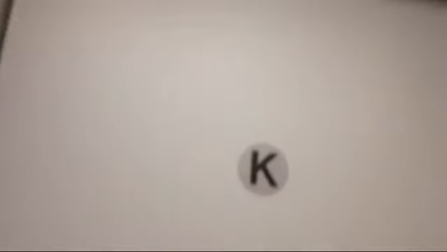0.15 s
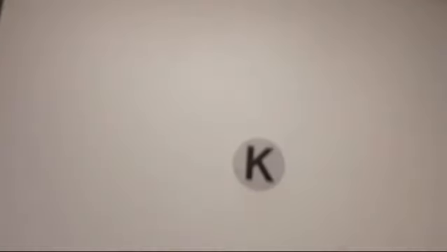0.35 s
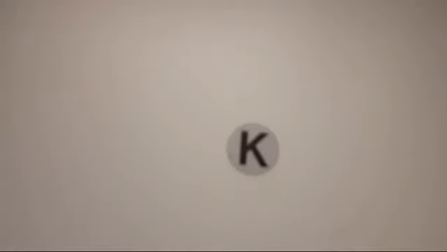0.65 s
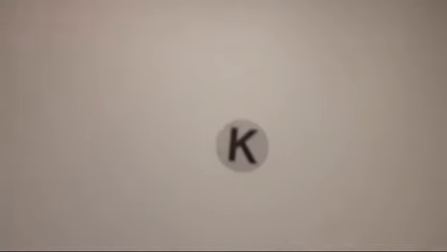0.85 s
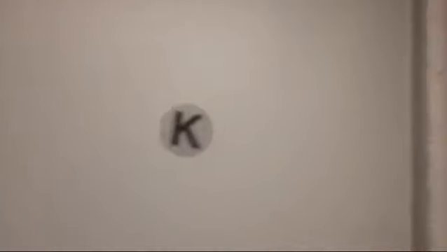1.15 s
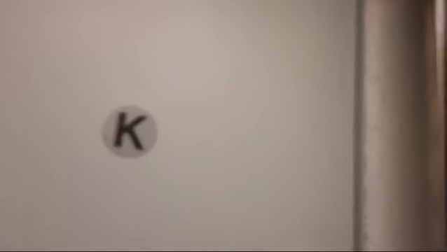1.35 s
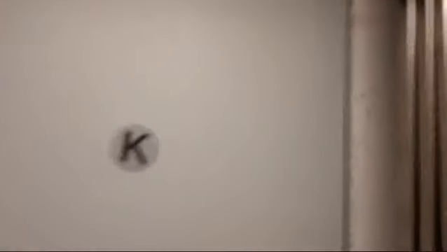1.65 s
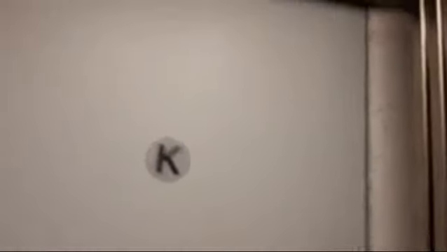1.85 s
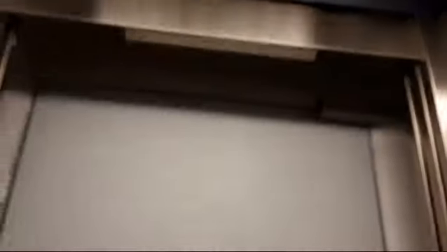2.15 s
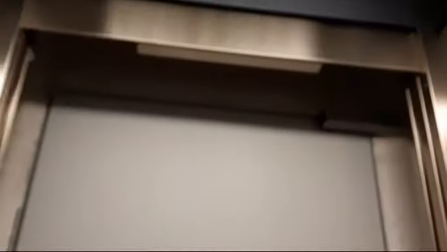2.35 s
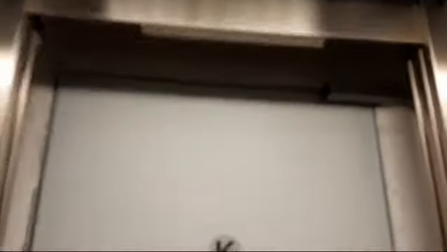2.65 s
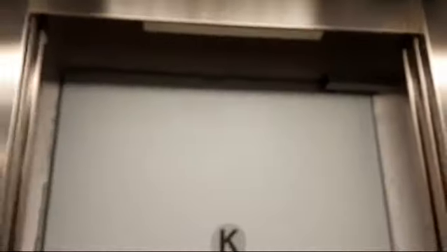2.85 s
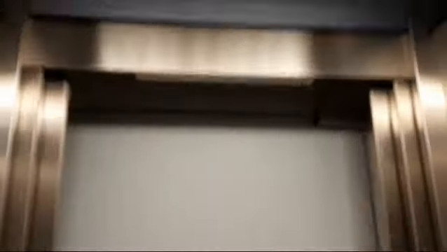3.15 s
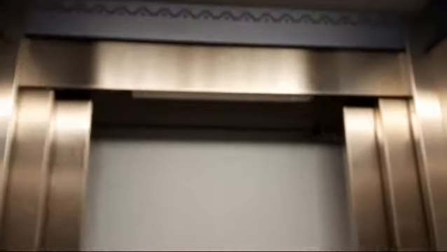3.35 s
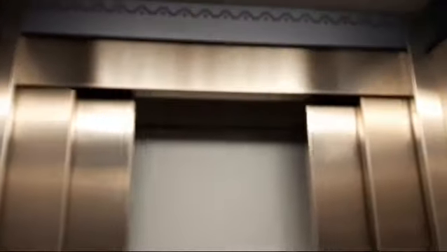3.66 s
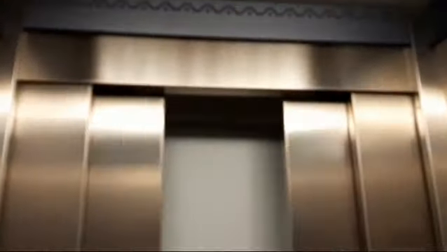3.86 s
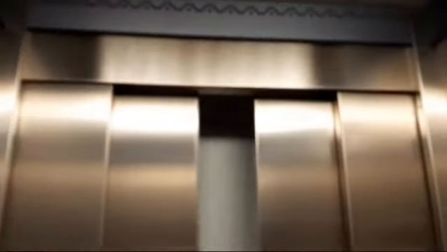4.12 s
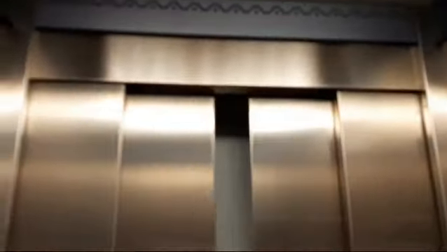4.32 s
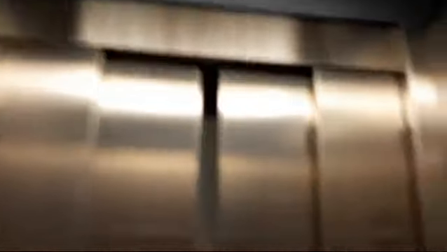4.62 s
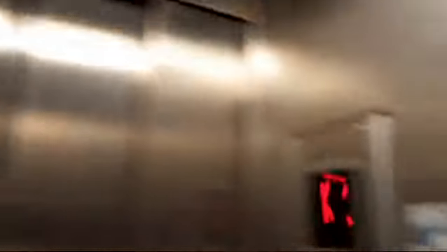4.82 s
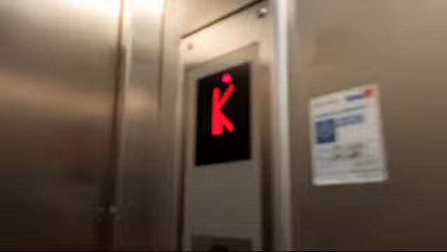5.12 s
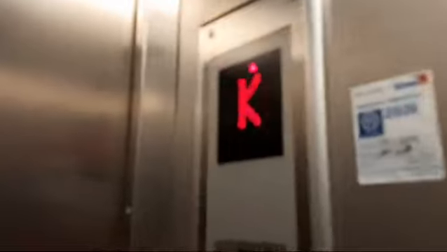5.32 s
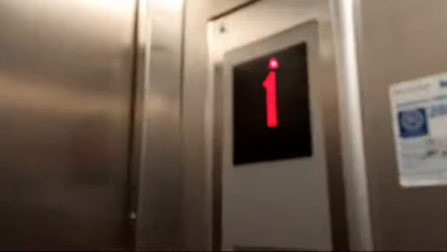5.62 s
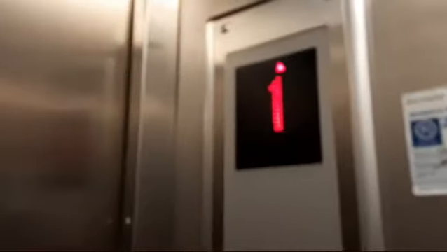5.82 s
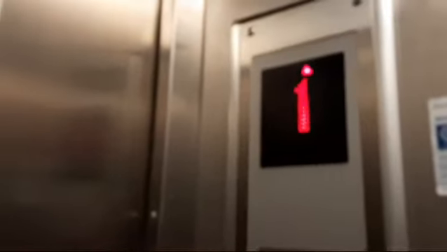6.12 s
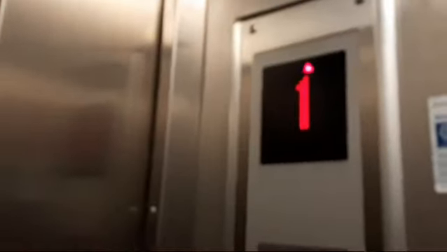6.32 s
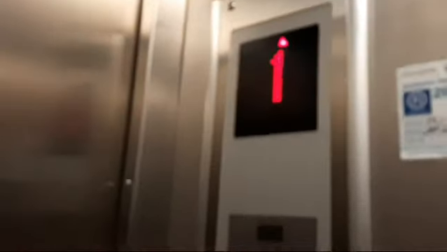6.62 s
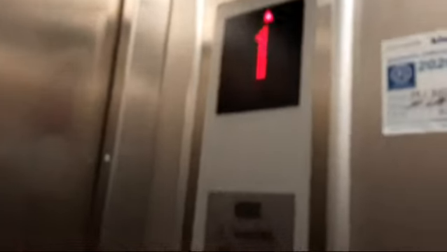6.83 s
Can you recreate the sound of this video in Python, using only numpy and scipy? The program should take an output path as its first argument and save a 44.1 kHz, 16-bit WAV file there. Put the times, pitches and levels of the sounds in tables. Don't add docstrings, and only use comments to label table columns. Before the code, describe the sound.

Close inside a small steel lift car, a faint fan hums while cloth rubs and trim ticks and pops. A sole scuffs and squeaks, feet thud on the hollow floor, then the door gear clanks hard and its rollers grind along. Knocks and soft thuds follow, the latch strikes sharply, and a low drone rises.

```python
import sys
import numpy as np
from scipy import signal
from scipy.fft import rfft, irfft, next_fast_len
from scipy.io import wavfile

SR = 44100
rng = np.random.default_rng(int(sys.argv[2]) if len(sys.argv) > 2 else 0)


def volts_from_db(level):
    exponent = np.asarray(level, float) / 20
    return 10 ** exponent


def pcm_store(signal):
    levels = np.round(np.clip(np.atleast_2d(signal), -1, 1) * 32767)
    wavfile.write(sys.argv[1], SR, levels.astype(np.int16).T)


N = 307818


def in_time(table):
    s, *columns = np.transpose(table)
    return [np.interp(np.arange(N) / SR, s, column) for column in columns]


def at_hz(points, hz):
    point_hz, value = np.transpose(points)
    return np.interp(np.log(hz + 1), np.log(point_hz), value)


def rms_one(x):
    return x / np.sqrt(np.mean(x ** 2) + 1e-20)


def drift(rate):
    steps = rng.standard_normal(int(N / SR * max(rate, 200)) + 2)
    return np.interp(np.arange(N) / SR * rate, np.arange(len(steps)), steps)


# (frequency [Hz], likeness [0-1])
PORT_LIKENESS = [(60, 0.99), (110, 1), (160, 0.66), (290, 0.77), (640, 0.59), (1400, 0.24), (2500, 0.051),
                 (15000, 0.096)]
# (frequency [Hz], left over right [dB])
PORT_BALANCE = [(60, -2.5), (180, -1.5), (550, -1.5), (1650, -3), (4970, -1.5), (15000, -7)]
PORT_LAG_S = 0.00042


def port_noise(spectrum=((10, 0), (20000, 0))):
    size = next_fast_len(N)
    hz = np.arange(size // 2 + 1) * SR / size
    left, other = rfft(rng.standard_normal((2, size))) * volts_from_db(at_hz(spectrum, hz))
    alike = np.clip(at_hz(PORT_LIKENESS, hz), 0, 1)
    lag_s = PORT_LAG_S * hz ** 2 / (hz ** 2 + 1130.0 ** 2)
    right = alike * np.exp(2j * np.pi * hz * lag_s) * left + np.sqrt(1 - alike ** 2) * other
    balance = volts_from_db(np.outer([.5, -.5], at_hz(PORT_BALANCE, hz)))
    return rms_one(irfft([left, right] * balance, size)[:, :N])


def peaks(x, modes):
    out = 0
    for k, (hz, width_hz, db) in enumerate(modes):
        r = np.exp(-np.pi * width_hz / SR)
        feed = [(1 - r * r) / 2, 0, (r * r - 1) / 2]
        back = [1, -2 * r * np.cos(2 * np.pi * hz / SR), r * r]
        out = out + (-1) ** k * volts_from_db(db) * signal.lfilter(feed, back, x)
    return out


def steady_tones(white, tones):
    out = 0
    for hz, width_hz, db in tones:
        narrow = peaks(white, [(hz, width_hz, 0)])
        out = out + volts_from_db(db) * rms_one(peaks(narrow, [(hz, 2 * width_hz, 0)]))
    return out


def ring(x, hz, t60):
    r, w = volts_from_db(-60 / (t60 * SR)), 2 * np.pi * hz / SR
    return signal.lfilter([0, np.sin(w)], [1, -2 * r * np.cos(w), r * r], x + 1e-18)


def band(x, hz, octaves):
    edges = hz * 2.0 ** (max(octaves, .05) * np.array([-1, 1]))
    return signal.sosfilt(signal.butter(2, np.minimum(edges, 19000), "band", fs=SR, output="sos"), x)


def bumps(per_s, size, fade_s):
    jolts = (rng.random(N) < per_s / SR) * np.minimum(rng.exponential(size, N), 2 * size)
    return rms_one(1 + signal.lfilter([1], [1, -np.exp(-1 / (fade_s * SR))], jolts))


def add(out, s, piece, db):
    i = round(s * SR)
    piece = piece[..., :N - i]
    out[:, i:i + piece.shape[-1]] += volts_from_db(db) * piece / np.max(np.abs(piece))


# (time [s], strength [dB], hardness [dB])
SHAKE = [(0, -54, 1.5), (.25, -60.5, 3.5), (.4, -63, -0.5), (.82, -65, -13), (1.2, -60, -15),
         (1.5, -61, -8), (1.7, -46.5, -15.5), (1.86, -60, 8.5), (2.42, -47, -6.5), (2.62, -50, 2),
         (3.04, -41, 3), (3.3, -32.5, -11.5), (4.2, -35, -10), (4.46, -48.5, -7), (5.12, -45, -4),
         (5.45, -51.5, -8), (6.33, -51.5, -14.5), (6.98, -50, -57)]
# (time [s], strength [dB], dying time [s], hardness [dB])
LURCHES = [(.29, -49, 0.012, -0.5), (0.599, -55.5, 0.14, -5.5), (1.07, -49.5, 0.023, -7.5),
           (1.69, -49, 0.024, 2.5), (1.9, -33, 0.12, -8), (2.1, -27, 0.11, -14.5), (2.79, -69, 0.044, -42),
           (3.36, -33, 0.018, -17), (3.45, -28.5, 0.13, -12.5), (3.82, -29.5, 0.021, -21),
           (4.05, -25.5, 0.064, -12), (4.358, -35.5, 0.034, -5), (4.74, -41.5, 0.039, -29),
           (5.06, -40, 0.093, -2), (5.57, -47, 0.17, -10.5), (6.06, -39.5, 0.11, -15),
           (6.168, -36.5, 0.044, -5), (6.56, -47, 0.029, -29), (6.74, -45, 0.12, -15.5)]
# (frequency [Hz], width [Hz], level [dB])
FLOOR_MODES = [(59.7, 7.5, 7.5), (86, 5.9, 8), (99, 12, -2)]
# (frequency [Hz], width [Hz], level [dB])
PANEL_MODES = [(236.3, 7.3, 3), (269, 30, -22), (294.4, 26.5, -7)]
# (frequency [Hz], density [dB per Hz])
WALL_NOISE = [(100, 3.5), (150, -1.5), (200, -2.5), (330, 2), (660, -2), (1000, -7.5), (1300, -7.5),
              (1700, -48)]
# (frequency [Hz], width [Hz], level [dB])
WALL_MODES = [(159.5, 27, -2), (410, 3.3, -2), (438.7, 11.6, -3.5), (499.6, 7, 4.5), (682.5, 4.2, -2.5),
              (740, 8.3, -17), (870, 3.9, -7.5)]
# (frequency [Hz], width [Hz], level [dB])
FAN = [(176.4, 26, -73), (264.6, 9.1, -70), (1496, 160, -74), (2050, 50, -83)]
LURCH_RISE_S = 0.023
PANEL_DB, PANEL_FOLLOWS = -20, 0.71
SWAY_HZ, SWAY_DB, TAUT_S, TAUT_DB = 39.9, -4.5, 5.88, -20
DRIVE_S, DRIVE_DB, DRIVE_DB_PER_S = 6.5, -73, 43.5
ROLL_FROM_S, ROLL_TO_S, ROLL_RAMP_S = 2.99, 4.35, 0.33


def car():
    t = np.arange(N) / SR
    shake_db, hard_db = in_time(SHAKE)
    soft_power, hard_power = volts_from_db(shake_db) ** 2, volts_from_db(shake_db + hard_db) ** 2
    for s, db, dying, hardness_db in LURCHES:
        fade = np.where(t < s, ((s - t) / LURCH_RISE_S) ** 2, (t - s) / dying)
        swell = volts_from_db(db) ** 2 * np.exp(-2 * fade)
        soft_power = soft_power + swell
        hard_power = hard_power + swell * volts_from_db(hardness_db) ** 2
    soft, hard = np.sqrt(soft_power), np.sqrt(hard_power)

    white, shake = port_noise(), port_noise(WALL_NOISE)
    shake = shake * bumps(22, .9, .012) ** np.interp(t, [ROLL_TO_S, ROLL_TO_S + .3], [1, .3])
    wall = rms_one(shake + volts_from_db(4.5) * peaks(shake, WALL_MODES))

    sway_db = np.interp(t, [TAUT_S - .2, TAUT_S + 0.14], [SWAY_DB, TAUT_DB])
    sway = band(white, SWAY_HZ, 0.34)
    lowest = volts_from_db(.4 * (sway_db - SWAY_DB)) * peaks(white, FLOOR_MODES[:1])
    floor = band(peaks(white, FLOOR_MODES[1:]) - lowest, 104.0, 0.97)

    drive = volts_from_db(DRIVE_DB + DRIVE_DB_PER_S * (t - DRIVE_S))
    panels = band(peaks(white, PANEL_MODES), 265, .4)
    panel_level = volts_from_db(PANEL_DB) * hard ** PANEL_FOLLOWS + drive

    rumble = soft * (rms_one(floor) + volts_from_db(sway_db) * rms_one(sway))
    return rumble + panel_level * rms_one(panels) + hard * wall + steady_tones(white, FAN)


# (time [s], bright level [dB], weight [dB])
RUB = [(0, -47, -4), (.2, -46, -9.5), (.3, -58, -9.5), (.65, -55.5, -9), (.88, -63.5, -33),
       (1.48, -59, -11), (1.62, -47, -3), (1.8, -41, -5), (2.38, -50.5, -4.5), (2.62, -44, -11),
       (3.14, -39, 2.5), (3.3, -43, 1.5), (4.1, -44, -2), (4.36, -51.5, -1.5), (5.3, -55, -5),
       (5.93, -50.5, -3.5), (6.4, -57, -15.5), (6.98, -51, -6)]
# (frequency [Hz], density [dB per Hz])
DULL_RUB = [(470, -18), (800, -6.5), (1340, -6.5), (1510, 1), (1670, -5.5), (2040, -4.5), (3600, -12.5),
            (4680, -12.5), (7920, -120)]
# (frequency [Hz], density [dB per Hz])
BRIGHT_RUB = [(1500, -18), (2500, -8), (3500, -3), (5000, -1), (7600, -0.5), (8700, -5.5), (10000, -7.5),
              (12000, -5.5), (15300, -10.5), (16300, -12.5)]
# (frequency [Hz], width [Hz], level [dB])
AIR_MODES = [(1252, 13, -14.5), (1540, 54, -8), (2050, 24, -14)]
# (time [s], rms level [dB], fade [s], centre [Hz], width [octaves])
SCUFFS = [(0.146, -40.5, 0.033, 4100, 1.6), (0.869, -58, 0.091, 3000, 2.3), (1.16, -57, 0.088, 5000, 2.1),
          (1.573, -41.5, 0.044, 1420, 2.26), (1.711, -33, 0.028, 9000, 1.8), (1.76, -45, 0.07, 6040, 0.46),
          (1.88, -31, 0.054, 4500, 1.17), (2.26, -29.5, 0.099, 4220, 0.97),
          (2.269, -37.5, 0.094, 865, 0.67), (3.09, -33.5, 0.14, 2430, 1.4), (4.169, -34, 0.036, 3100, 1.54),
          (4.656, -39, 0.11, 2780, 1.77), (4.72, -40, 0.45, 3840, 1.47), (5.02, -49, 0.028, 1540, 1.8),
          (5.256, -39, 0.07, 3500, 1.5), (5.6, -52.5, 0.31, 5000, 1.1), (6.036, -40, 0.13, 3300, 1.7)]
SCUFF_RISE = 0.5


def rubbing():
    bright_db, weight_db = in_time(RUB)
    dull_db = bright_db + weight_db
    catch_db = 1.2 * drift(25) + 1.2 * drift(120)
    dull = port_noise(DULL_RUB) * bumps(24, .45, .01)
    dull = rms_one(dull + volts_from_db(14.5) * peaks(dull, AIR_MODES))
    hiss = volts_from_db(bright_db + catch_db) * port_noise(BRIGHT_RUB) + volts_from_db(dull_db + catch_db) * dull

    white, t = port_noise() * volts_from_db(catch_db), np.arange(N) / SR
    for s, db, fall, hz, octaves in SCUFFS:
        rise = SCUFF_RISE * fall
        span = slice(round(s * SR), round((s + 4.7 * fall) * SR))
        late = t[span] - s - rise
        stroke = np.exp(-2 * (late / np.where(late < 0, rise, fall)) ** 2)
        hiss[:, span] += volts_from_db(db) * stroke * rms_one(band(white[:, span], hz, octaves))
    return hiss


# (time [s], peak level [dB], centre [Hz], width [octaves])
TICKS = [(.044, -44, 1500, 1.2), (0.184, -28, 1600, 2.4), (0.214, -44, 1170, 0.72), (.239, -29, 1500, 2.5),
         (0.266, -31.5, 4000, 1.3), (.309, -33.5, 1500, 2.8), (.352, -47, 1600, 0.96),
         (.381, -52, 1980, 1.8), (.409, -51, 2000, 1.5), (0.424, -35, 2980, 1.8), (0.626, -29, 2420, 2.2),
         (.688, -48, 5000, 1.2), (.74, -35, 3000, 7.7), (1.056, -31.5, 2050, 3.1),
         (1.073, -40.5, 3000, 3.6), (1.481, -50, 2500, 1.4), (1.689, -35, 2000, 2),
         (2.096, -24.5, 6500, 0.52), (2.098, -40, 600, 1), (2.127, -32, 5070, 0.77), (2.128, -33, 700, 1.7),
         (2.624, -36, 2300, 0.55), (4.176, -36, 13000, .8), (4.291, -25, 3020, .8),
         (4.2914, -23, 11300, 0.75), (4.438, -44, 3150, 0.41), (6.676, -47, 2000, 1.4)]


def ticks():
    out, t = np.zeros((2, N)), np.arange(SR // 25) / SR
    for s, db, hz, octaves in TICKS:
        grit = rng.standard_normal((2, len(t))) * np.exp(-t / .004)
        click = np.arange(len(t)) == [[0], [1]]
        snap = band(click + .05 * grit, hz, octaves)
        add(out, s, snap + volts_from_db(17.0) * peaks(snap, AIR_MODES), db + 6.0)
    return out


# (time [s], peak level [dB], frequency [Hz])
POPS = [(0.061, -42, 235), (0.121, -39, 332), (0.138, -38, 248), (0.165, -33, 312), (0.29, -43, 340),
        (0.321, -42, 253), (0.346, -39, 402), (0.382, -36.5, 403), (0.412, -38.5, 395), (0.546, -42, 337),
        (0.689, -39.5, 410), (0.739, -34, 410), (1.073, -40, 398), (1.643, -28.5, 370), (1.69, -29.5, 355)]


def pops():
    out, t = np.zeros((2, N)), np.arange(SR // 25) / SR
    for s, db, hz in POPS:
        swell = np.exp(-((t * hz - 1.4) / .85) ** 2)
        tone = np.sin(2 * np.pi * hz * t) + 0.33 * np.sin(3.4 * np.pi * hz * t)
        add(out, s, swell * tone * volts_from_db([[0], [-3.0]]), db + 1.5)
    return out


# (time [s], peak level [dB], frequency [Hz], t60 [s])
PINGS = [(1.73, -35, 5200, 0.09), (1.755, -34, 10300, .04), (1.792, -26, 6950, 0.047),
         (1.916, -30.5, 2620, 0.067), (2.561, -37.5, 2050, 0.21), (2.563, -38, 2440, 0.091),
         (2.965, -20.5, 1993, 0.26), (3.175, -24, 1500, .1), (3.176, -26.5, 750, 0.054),
         (3.21, -29, 2050, .05), (3.222, -23, 3840, 0.041), (3.222, -31.5, 760, 0.044),
         (3.337, -31, 1830, .07), (3.512, -25, 2050, 0.16), (3.514, -30, 870, 0.11),
         (3.697, -29, 2310, 0.02), (3.704, -30, 2200, 0.021), (3.711, -23, 2900, 0.027),
         (3.72, -29, 2100, 0.14), (4.021, -29, 2036, .08), (4.155, -31.5, 655, 0.21),
         (4.425, -41, 1800, 0.076), (4.427, -41, 2290, 0.1)]


def pings():
    out, t, white = np.zeros((2, N)), np.arange(SR // 2) / SR, port_noise()
    for s, db, hz, t60 in PINGS:
        tap = white[:, round(s * SR):][:, :len(t)]
        tap = tap * np.exp(-t[:tap.shape[1]] / .005)
        upper = .6 * ring(tap, 1.05 * hz, .4 * t60)
        lower = .5 * ring(tap, .93 * hz, .3 * t60)
        add(out, s, ring(tap, hz, .7 * t60) + upper + lower, db)
    return out


# (time [s], frequency [Hz], level [dB], octave level [dB])
SQUEAK = [
    (1.765, 5550, -48, -55),
    (1.775, 5562, -38, -44),
    (1.8, 5578, -36, -40),
    (1.817, 5610, -31, -29),
    (1.826, 5655, -36, -29),
    (1.848, 5668, -36, -31),
    (1.876, 5730, -37, -37),
    (1.89, 5715, -41, -44),
    (1.92, 5715, -47, -49),
]
# (time [s], length [s], depth [dB], octave depth [dB])
GRIPS = [
    (1.805, .003, -2, -10),
    (1.824, .004, -16, -1),
    (1.844, .002, -9, -2),
    (1.854, .003, -10, -14),
    (1.866, .003, -10, -6),
    (1.886, .003, -16, -8),
    (1.896, .002, -8, -8),
    (1.905, .003, -12, -8),
]


def squeak():
    hz, db, octave_db = in_time(SQUEAK)
    t = np.arange(N) / SR
    for s, length, depth_db, octave_depth_db in GRIPS:
        grip = np.exp(-((t - s) / length) ** 2)
        db = db + depth_db * grip
        octave_db = octave_db + octave_depth_db * grip
    start, end = SQUEAK[0][0], SQUEAK[-1][0]
    gate = np.interp(t, [start, start + .005, end - .01, end], [0, 1, 1, 0])
    wobble = np.interp(t, [1.82, 1.88], [.002, .007])
    turns = np.cumsum(hz * (1 + wobble * drift(400))) / SR
    phase = 2 * np.pi * turns + np.array([[0], [.8]])
    flutter = volts_from_db(2.5 * np.array([drift(190), drift(170)]))
    return gate * flutter * (volts_from_db(db) * np.sin(phase) + volts_from_db(octave_db) * np.sin(2 * phase))


# (time [s], peak level [dB], frequency [Hz], held [s], wall ring [dB])
THUDS = [(1.865, -19, 85.4, 0.033, -28), (1.981, -19.5, 86, 0.036, -28), (2.053, -19.5, 86, 0.028, -29),
         (2.116, -21, 92, 0.019, -36), (2.152, -25.5, 90, 0.023, -36.5), (2.785, -29, 74.6, 0.014, -42),
         (3.441, -44, 78.5, 0.015, -52), (4.334, -33, 80.4, 0.018, -47), (4.495, -29.5, 75, 0.034, -51),
         (4.725, -46, 83.4, 0.037, -75), (4.91, -32, 80, 0.03, -69), (5.164, -39, 75, 0.012, -48),
         (5.475, -25.5, 73, 0.026, -40.5), (5.518, -25, 67, 0.022, -41.5), (5.558, -32, 73.6, 0.018, -44),
         (5.597, -39, 77.5, 0.015, -53), (5.908, -29, 86, 0.034, -49), (6.728, -40.5, 74.3, 0.043, -65)]
# (frequency [Hz], level [dB], t60 [s])
THUD_MODES = [(165, -11, 0.022), (244.2, -1, 0.22), (300.6, -0.5, 0.12), (409, -8, 0.16),
              (626, -14.5, 0.14)]
THUD_SWELL, THUD_DAMP_S = .35, .005


def thuds():
    out, t = np.zeros((2, N)), np.arange(SR // 4) / SR
    for s, db, hz, held, wall_db in THUDS:
        start = np.minimum(t / 0.00038 * volts_from_db(db), 1)
        swell = 1 + THUD_SWELL * np.minimum(t / held, 1)
        damping = np.exp(-np.maximum(t - held, 0) / THUD_DAMP_S)
        add(out, s, -start * swell * damping * np.sin(2 * np.pi * hz * t), db)

        blow = np.exp(-t / 0.00089) * (t < .006)
        blow = blow + 0.67 * np.roll(blow, round(held * SR))
        luck_db = rng.normal(0, 1.6, len(THUD_MODES))
        walls = sum(volts_from_db(d + luck) * ring(blow, f, t60) for (f, d, t60), luck in zip(THUD_MODES, luck_db))
        add(out, s, -walls * volts_from_db([[.5], [-.5]]), wall_db + 7.5)
    return out


# (time [s], peak level [dB], centre [Hz], width
# [octaves], t60 [s])
KNOCKS = [(2.691, -40, 546, 1.4, 0.14), (2.777, -42.5, 544, 0.23, 0.04), (2.9, -33, 900, 3, 0.26),
          (2.962, -30.5, 4100, 0.37, 0.28), (2.981, -29.5, 437, 0.98, 0.27), (3.004, -27, 586, 0.83, 0.28),
          (3, -21.5, 3830, 0.59, 0.19), (3.17, -35.5, 870, 0.46, 0.55), (3.168, -29.5, 3000, 0.74, 0.15),
          (3.506, -32.5, 1440, 0.89, 0.25), (3.508, -35, 5470, 0.44, 0.16),
          (3.695, -47, 4600, 0.096, 0.061), (3.695, -30, 2420, 0.7, 0.22), (3.702, -30, 766, 1.6, 0.44),
          (4.018, -34, 1540, 1, 0.48), (4.303, -34, 1580, 1.65, 0.32), (4.494, -45.5, 1920, 0.25, 0.14),
          (5.047, -42, 491, 1.9, 0.84), (5.476, -43, 900, 0.76, 0.39), (5.482, -26.5, 5150, 1.03, 0.29),
          (5.856, -42.5, 900, 1.2, 0.15), (5.859, -41.5, 2970, 0.79, 0.097), (6.127, -34, 4700, 0.18, 0.24),
          (6.124, -26.5, 1830, 1.9, 0.37)]


def knocks():
    out, t, white = np.zeros((2, N)), np.arange(SR // 2) / SR, port_noise()
    for s, db, hz, octaves, t60 in KNOCKS:
        rattle = white[:, round(s * SR):][:, :len(t)]
        rattle = rattle * np.minimum(t / 0.0025, 1) * volts_from_db(-60 * t / t60)
        add(out, s, band(rattle, hz, octaves), db + 8.0)
    return out


# (frequency [Hz], width [Hz], level [dB])
RAIL_TONES = [(155, 40, -44), (690, 45, -55), (1240, 45, -55)]
TREAD_HZ, TREAD_OCTAVES, TREAD_DB = 800, 0.9, -49


def rollers():
    t, white = np.arange(N) / SR, port_noise()
    turning = np.clip(np.minimum(t - ROLL_FROM_S, ROLL_TO_S - t) / ROLL_RAMP_S, 0, 1)
    song = volts_from_db(3.9 * drift(18)) * steady_tones(white, RAIL_TONES)
    tread = rms_one(band(port_noise() * bumps(70, .8, .005), TREAD_HZ, TREAD_OCTAVES))
    return turning * (song + volts_from_db(TREAD_DB) * tread)


# (frequency [Hz], level [dB], t60 [s])
DOOR_MODES = [(325, -18, .12), (376, -8, 0.23), (426, -0.5, 0.25), (535, -2, 0.14), (670, -2, 0.18),
              (738, 1, 0.34), (785, -5, 0.15), (1120, -18, 0.13), (1252, -4.5, 0.24), (1515, 10, 0.059),
              (2045, 3.5, 0.092), (3600, -9, .1), (4000, -15, 0.08), (4300, -10, 0.08)]
# (frequency [Hz], level [dB], t60 [s])
LATCH_MODES = [(660, -9, 0.24), (734, 1, 0.18), (898, 3.5, 0.11), (1120, 2, 0.2), (1484, 9, 0.13),
               (1970, 4, 0.1), (3420, 7, 0.1), (3770, -9, 0.12), (4480, 4, 0.24), (4530, 8, .2),
               (4930, 10, 0.1), (5060, 13, 0.086), (5200, -3, 0.2), (6730, -3, .12)]


def clank_and_latch():
    out, t, white = np.zeros((2, N)), np.arange(SR // 2) / SR, port_noise()
    # (time [s], peak level [dB], grind [s], modes)
    for s, db, grind, modes in [(3.0, -11.5, 0.0092, DOOR_MODES), (6.125, -16.5, 0.0045, LATCH_MODES)]:
        push = white[:, round(s * SR):][:, :len(t)] * t * np.exp(-t / grind)
        steel = sum(volts_from_db(d) * rms_one(ring(push, f, t60)) * np.sqrt(t60) for f, d, t60 in modes)
        add(out, s, steel, db)
    return out


# (time [s], left over right [dB])
SIDEWAYS = [
    (0, 6),
    (1.3, 4.5),
    (1.6, 1.5),
    (6.98, 4),
]


def scene():
    mix = car() + rubbing() + ticks() + pops() + pings() + squeak()
    mix = mix + thuds() + knocks() + rollers() + clank_and_latch()
    return mix * volts_from_db(np.outer([.5, -.5], in_time(SIDEWAYS)[0]))


def roll_off(x):
    return signal.sosfilt(signal.butter(12, 16970, fs=SR, output="sos"), x)


def record(dry):
    x = signal.sosfilt(signal.butter(4, 33, "high", fs=SR, output="sos"), dry)
    x = x - 0.77 * peaks(x, [(8880, 3770, 0)])
    x = signal.sosfilt(signal.cheby2(24, 60, 16120, fs=SR, output="sos"), x)
    return roll_off(x)


dry = scene()
out = record(dry)
pcm_store(out)
```